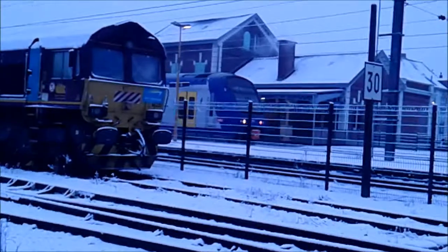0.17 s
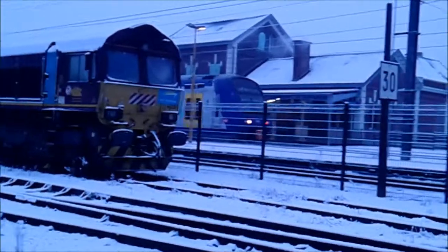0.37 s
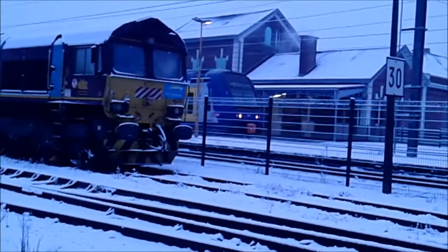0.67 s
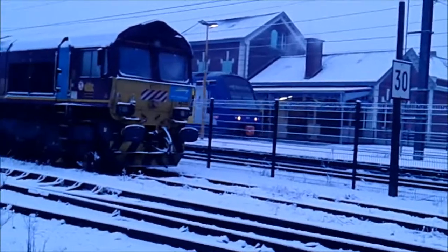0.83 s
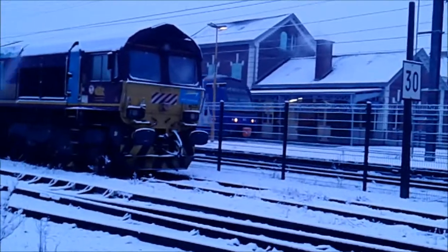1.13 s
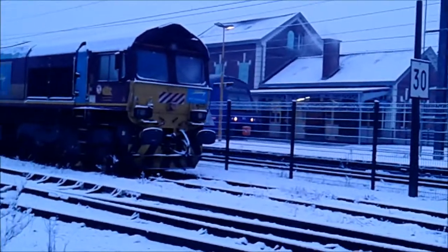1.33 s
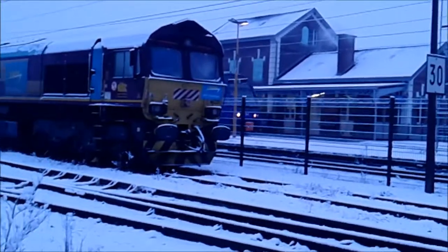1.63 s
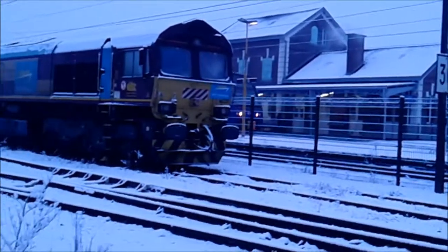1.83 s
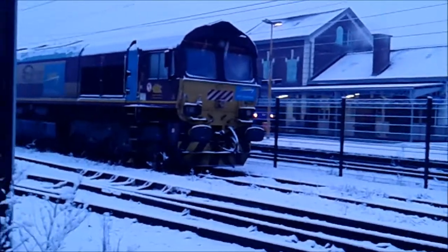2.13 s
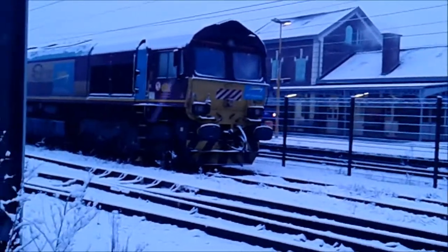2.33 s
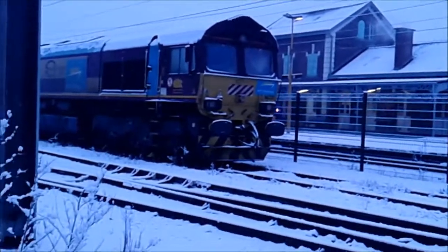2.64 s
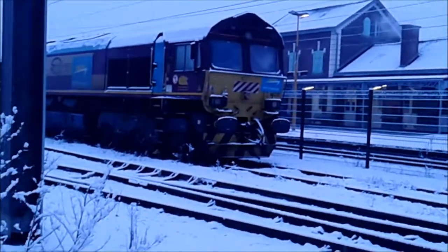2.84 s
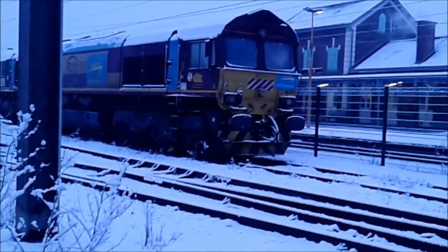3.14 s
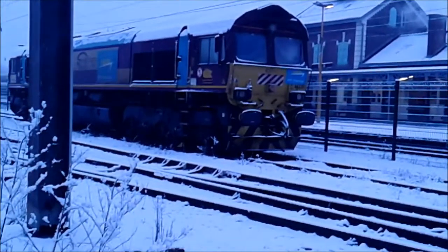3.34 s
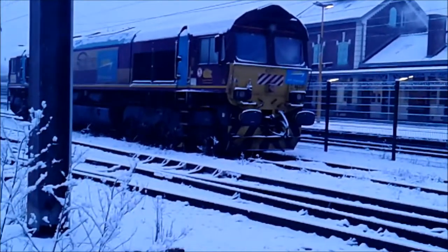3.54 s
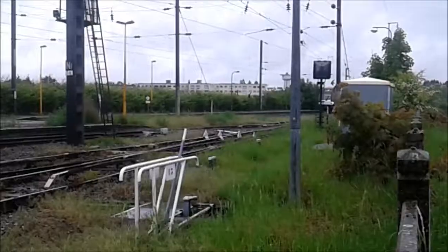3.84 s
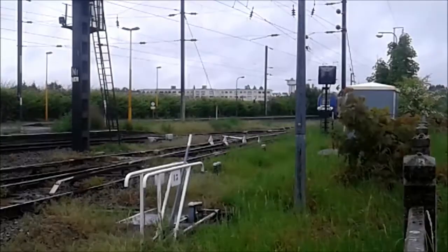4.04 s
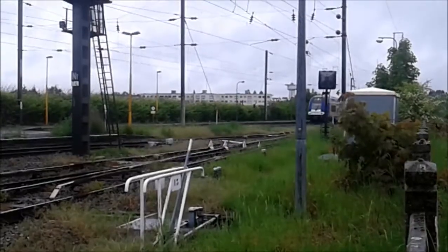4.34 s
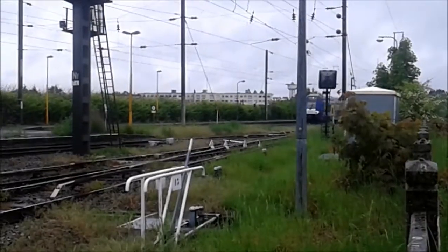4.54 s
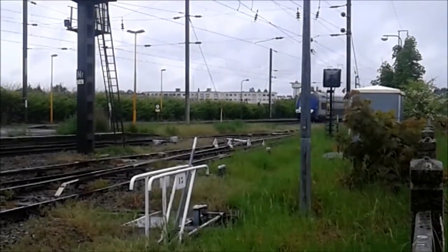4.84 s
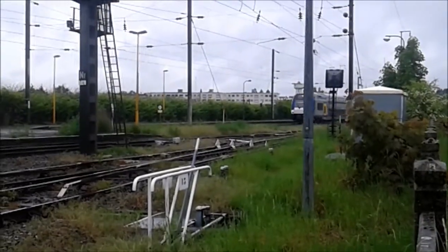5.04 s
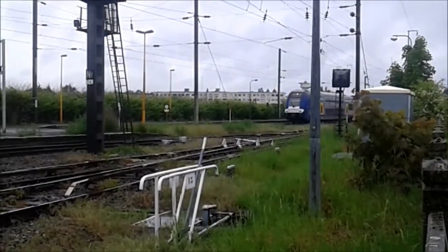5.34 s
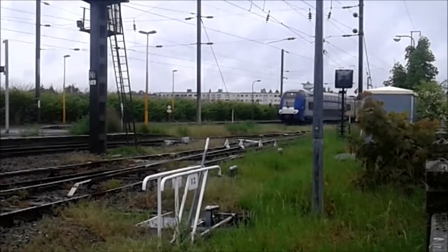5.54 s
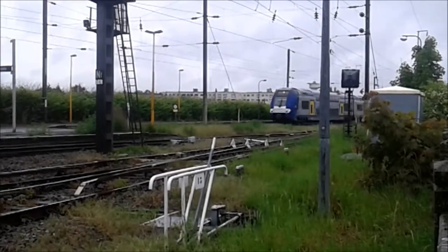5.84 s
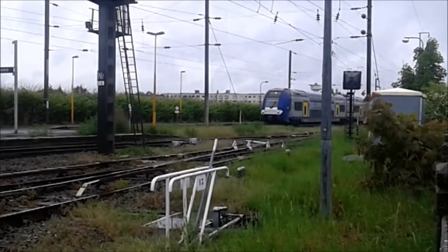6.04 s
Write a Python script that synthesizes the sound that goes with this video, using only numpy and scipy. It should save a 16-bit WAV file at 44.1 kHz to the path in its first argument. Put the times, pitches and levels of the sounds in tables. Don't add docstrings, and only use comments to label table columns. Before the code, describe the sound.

Outdoor rail yard through a handheld camera microphone with faint hiss. A diesel idles low while a train rolls by; fingers knock the camera, rails groan softly, sparrows chirp. Brief scrapes lead into a loud, high, wavering wheel squeal. It cuts to total silence, then a wet yard: rain patter, sharp drops ticking on the camera, and a train rumbling closer with soft thuds over joints.

```python
import sys
import numpy as np
from scipy import signal
from scipy.fft import rfft, irfft, next_fast_len
from scipy.io import wavfile
from scipy.ndimage import uniform_filter1d, map_coordinates

SR = 44100
rng = np.random.default_rng(int(sys.argv[2]) if len(sys.argv) > 2 else 0)


def store_wav(level_fs):
    pcm = np.round(np.clip(np.atleast_2d(level_fs), -1, 1) * 32767)
    wavfile.write(sys.argv[1], SR, pcm.T.astype(np.int16))


def linear_from_db(decibels):
    return 10 ** (np.asarray(decibels, float) / 20)


N = 273414


def unit(x):
    return x / np.sqrt(np.mean(np.abs(x) ** 2) + 1e-20)


def curves(rows):
    s, *cols = np.transpose(rows)
    return [np.interp(np.arange(N) / SR, s, c) for c in cols]


def wobble(rate_hz, count=N):
    knots = rng.standard_normal(int(count * rate_hz / SR) + 4)
    return map_coordinates(knots, [np.arange(count) * rate_hz / SR])


def filtered(x, response):
    m = next_fast_len(N + 8192)
    return irfft(rfft(x, m) * response(np.fft.rfftfreq(m, 1 / SR)), m)[:N]


def rush(spectrum, patchy_db):
    z = signal.stft(rng.standard_normal(N), nperseg=512)[2]
    field = uniform_filter1d(rng.standard_normal(z.shape), size=6, axis=0)
    field = uniform_filter1d(field, size=12, axis=1)
    x = signal.istft(z * linear_from_db(patchy_db * unit(field)), nperseg=512)[1][:N]
    f, db = np.transpose(spectrum)
    return unit(filtered(x, lambda hz: linear_from_db(np.interp(np.log(hz + 1), np.log(f), db, -120, -120))))


def ring(hz, t60_s, t):
    return np.sin(2 * np.pi * hz * t) * linear_from_db(-60 * t / t60_s) * (1 - np.exp(-t * hz * 2))


# (centre [Hz], width [Hz], level [dB rms])
IDLE_LINES = [
    (97.9, 33, -48),
    (390.2, 10, -59.5),
    (554, 8.6, -62.5),
    (2096, 21, -70),
]
# (frequency [Hz], density [dB per Hz])
SNOW_RUMBLE = [(12, -51), (20, -14.5), (86, 3), (102, -3.5), (125, -2.5), (261, -12), (311, -16.5),
               (353, -13), (380, -13), (400, -19), (520, -42.5), (880, -120)]
# (frequency [Hz], density [dB per Hz])
SNOW_ROLL = [(150, -39.5), (250, -6.5), (334, -10), (381, -4), (466, -8), (651, -10), (731, -12.5),
             (991, -12.5), (1650, -17.5), (2370, -19.5), (3820, -28.5), (4750, -14.5), (8000, -43.5),
             (10400, -62), (17600, -120)]
# (time [s], level [dB])
ROLLING = [
    (0, -50),
    (.2, -52),
    (.6, -50),
    (1.25, -53),
    (2.05, -49),
    (2.95, -49.5),
    (3.5, -51),
]
# (time [s], peak level [dB])
SCRAPES = [
    (1.285, -47.5),
    (1.37, -55),
    (1.42, -50),
]
SNOW_RUMBLE_DB, RUMBLE_FOLLOWS = -47, .5
SCRAPE_RISE_DB_S, SCRAPE_FALL_DB_S = 450, 800


def snowy_yard():
    roll_db, = curves(ROLLING)
    rumble_db = SNOW_RUMBLE_DB + RUMBLE_FOLLOWS * (roll_db - roll_db.mean())
    out = linear_from_db(rumble_db - 0.5 + 2.1 * wobble(9)) * rush(SNOW_RUMBLE, patchy_db=0.5)
    out += linear_from_db(roll_db + 0.72 + 0.52 * wobble(6)) * rush(SNOW_ROLL, patchy_db=1.3)
    for hz, width_hz, db in IDLE_LINES:
        line = lambda f: width_hz ** 2 / ((f - hz) ** 2 + width_hz ** 2 / 4)
        out += linear_from_db(db) * unit(filtered(rng.standard_normal(N), line))
    flange = [(3900, -20), (4400, -4), (4700, -6.0), (5100, -10.0), (5700, -31.5)]  # (Hz, dB per Hz)
    scrape = np.zeros(N)
    for s, db in SCRAPES:
        late = np.arange(N) / SR - s
        scrape += linear_from_db(db + np.minimum(SCRAPE_RISE_DB_S * late, -SCRAPE_FALL_DB_S * late))
    return out + scrape * linear_from_db(2.3 * wobble(59.7)) * rush(flange, patchy_db=0.5)


# (delay [s], length [s], start [Hz], middle [Hz], end [Hz])
CALL = [
    (0, .043, 3850, 4450, 4050),
    (.008, .033, 3400, 3650, 3500),
    (.048, .045, 3330, 3030, 3070),
]
# (time [s], pitch factor [1], level [dB])
CALLS_AT = [
    (.795, 1, -50.5),
    (1.954, .975, -53),
    (3.483, 1.005, -53.5),
]
# (time [s], length [s], start [Hz], end [Hz], level [dB])
CHEEPS = [(.214, .02, 4800, 4100, -51), (.755, .02, 4000, 4450, -53), (.77, .018, 4450, 4680, -44),
          (1.41, .05, 4400, 2500, -59), (.893, .015, 3420, 3550, -58), (1.96, .014, 2900, 3300, -52),
          (2.108, .014, 2750, 2750, -53), (3.525, .03, 3950, 3500, -57), (3.575, .03, 4100, 4400, -55),
          (3.6, .022, 3320, 3220, -56), (3.675, .03, 4150, 4050, -55), (3.685, .025, 3280, 3250, -58),
          (3.77, .03, 4050, 4100, -56), (.765, .012, 5150, 5200, -53), (4.81, .03, 4350, 4350, -46),
          (5.92, .022, 4400, 4350, -40), (5.945, .017, 4100, 4300, -45)]
CALL_FADES_DB_S, CHEEP_ARCH_HZ = 15, 100


def sparrows():
    out = np.zeros(N)
    notes = []
    for s, factor, db in CALLS_AT:
        for delay, length, *bend_hz in CALL:
            notes.append((s + delay, length, *np.multiply(factor, bend_hz), db - CALL_FADES_DB_S * delay))
    for s, length, start_hz, end_hz, db in CHEEPS:
        notes.append((s, length, start_hz, (start_hz + end_hz) / 2 + CHEEP_ARCH_HZ, end_hz, db))
    for s, length, start_hz, mid_hz, end_hz, db in notes:
        u = np.linspace(0, 1, round(length * SR))
        bend = np.polyfit([0, .5, 1], [start_hz, mid_hz, end_hz], 2)
        hz = rng.normal(1, .008) * np.polyval(bend, u)
        level = linear_from_db(db + 3 + 3.5 * wobble(130, count=len(u))) * np.abs(np.sin(np.pi * u)) ** .7
        out[round(s * SR):][:len(u)] += level * np.sin(2 * np.pi * np.cumsum(hz) / SR)
    walls = rng.standard_normal(SR // 3) * linear_from_db(-60 * np.arange(SR // 3) / SR / 0.6)
    return out + linear_from_db(-5) * signal.fftconvolve(out, walls / np.linalg.norm(walls))[:N]


# (time [s], peak level [dB], body [Hz], click [dB])
KNOCKS = [
    (0.355, -29.5, 455, -17.5),
    (0.396, -34, 522, -15),
    (0.414, -32.5, 716, -16.5),
    (0.467, -21.5, 665, -17.5),
]


def knocks():
    out, t = np.zeros(N), np.arange(SR // 25) / SR
    for s, db, body_hz, click_db in KNOCKS:
        body = linear_from_db(6.5) * ring(body_hz, 0.014, t)
        thump = linear_from_db(3.0) * ring(222, 0.017, t)
        click = ring(1230, 0.014, t) + ring(1740, 0.0057, t) + ring(2230, 0.005, t)
        knock = body + thump + linear_from_db(click_db + 14.0) * click
        out[round((s + .001) * SR):][:len(t)] += linear_from_db(db) * knock
    return out


ONSET_SHARE, RELEASE_SHARE, EDGE_DB = 0.33, 0.28, -9.5


def strand(s, length, start_hz, end_hz, db):
    share = np.array([0, ONSET_SHARE, 1 - RELEASE_SHARE, 1])
    pitch_hz = start_hz + (end_hz - start_hz) * share
    level_db = db + EDGE_DB * np.array([1, 0, 0, 1])
    return np.transpose([s + length * share, pitch_hz, level_db])


def sing(out, rows, flutter_hz, rough, fade_s=0.02):
    s, hz, db, *octave_db = np.transpose(rows)
    t = np.arange(s[0], s[-1] + fade_s, 1 / SR)
    gate = np.clip(np.minimum(t - s[0], t[-1] - t) / fade_s, 0, 1) ** 2
    shake = lambda rate_hz: unit(wobble(rate_hz, len(t)) + 1j * wobble(rate_hz, len(t)))
    slips = linear_from_db(-12) * shake(3.5 * flutter_hz) + linear_from_db(-28) * shake(11 * flutter_hz)
    grip = unit(np.sqrt(1 - rough) + np.sqrt(rough) * shake(flutter_hz) + slips)
    pitch_hz = np.interp(t, s, hz) * (1 + .0011 * wobble(25, len(t)))
    tone = grip * np.exp(2j * np.pi * np.cumsum(pitch_hz) / SR)
    sound = linear_from_db(np.interp(t, s, db)) * tone
    if octave_db:
        sound = sound + linear_from_db(np.interp(t, s, octave_db[0])) * tone ** 2 / np.abs(tone)
    start = round(s[0] * SR)
    return out + np.pad(np.sqrt(2) * gate * sound.real, (start, N - start - len(t)))


# (time [s], length [s], start [Hz], end [Hz], level [dB])
GRIPS = [(1.441, 0.13, 4595, 4604, -47), (1.49, 0.17, 4620, 4624, -34), (1.57, 0.28, 4645, 4616, -26),
         (1.75, 0.24, 4710, 4808, -24), (1.77, .26, 4726, 4665, -29), (1.85, 0.2, 4620, 4560, -30.5),
         (1.96, 0.17, 4762, 4763, -23.5), (2.1, 0.167, 4740, 4694, -33), (2.2, 0.25, 4700, 4680, -23.5),
         (2.31, .35, 4627, 4692, -27.5), (2.42, .24, 4697, 4720, -22.5), (2.57, .34, 4805, 4873, -31),
         (2.61, 0.32, 4750, 4803, -30), (2.83, .18, 4750, 4724, -28.5), (2.87, .27, 4834, 4823, -26),
         (2.96, .32, 4743, 4780, -21), (3.17, 0.26, 4800, 4824, -24), (3.26, .28, 4706, 4780, -28),
         (3.41, 0.18, 4910, 4938, -24), (3.57, 0.15, 4940, 4933, -31.5), (3.657, 0.21, 4893, 4940, -23)]
# (time [s], octave over fundamental [dB])
PRESSURE = [
    (1.5, -49),
    (1.85, -28.5),
    (2.05, -45),
    (2.3, -34),
    (2.56, -20.5),
    (2.9, -31),
    (3.1, -42),
    (3.36, -27),
    (3.62, -38.5),
]
# (time [s], length [s], start [Hz], end [Hz], level [dB])
SIDE_MODES = [(1.93, .34, 4338, 4362, -35.5), (2.4, .25, 4246, 4261, -54), (2.41, .22, 5164, 5162, -48),
              (2.6, .17, 4370, 4370, -58), (2.97, .23, 4385, 4382, -58), (3.43, .12, 5096, 5102, -50),
              (2.47, .35, 7285, 7410, -58.5), (2.87, .3, 7425, 7415, -64.5), (3.34, .39, 7450, 7368, -60),
              (2.98, .17, 7120, 7131, -62), (1.08, .38, 13303, 13245, -76), (2.38, .34, 14058, 14197, -74),
              (1.96, .2, 8700, 8700, -66), (2.82, .2, 4640, 4635, -46), (3.2, .1, 4910, 4910, -40),
              (3.72, .12, 4455, 4450, -57), (1.75, .2, 4820, 4860, -40)]
# (time [s], length [s], start [Hz], end [Hz], level [dB])
GROANS = [
    (.47, .16, 570, 600, -57),
    (.6, .3, 612, 642, -53.5),
    (.82, .32, 642, 654, -57),
    (.77, .33, 426, 436, -57),
    (2.09, .18, 985, 992, -57),
    (2.7, .19, 630, 605, -59.5),
    (2.88, .24, 590, 645, -52.5),
]


def squeal():
    out = np.zeros(N)
    for grip in GRIPS:
        rows = strand(*grip)
        octave_db = rows[:, 2] + np.interp(rows[:, 0], *np.transpose(PRESSURE))
        out = sing(out, np.column_stack([rows, octave_db]), flutter_hz=62, rough=.36)
    for mode in SIDE_MODES:
        out = sing(out, strand(*mode), flutter_hz=60, rough=.5)
    for groan in GROANS:
        out = sing(out, strand(*groan), flutter_hz=14, rough=.2)
    loud = np.sqrt(np.abs(uniform_filter1d(out ** 2, size=SR // 5)))
    steel = [(2500, -11), (4000, 5.5), (7000, -5), (14000, -10.5)]
    return linear_from_db(0.45) * out + linear_from_db(-30.5) * loud * rush(steel, patchy_db=2.5)


# (frequency [Hz], density [dB per Hz])
WET_RUMBLE = [(12, -48), (20, -24), (97, 0.5), (203, -7), (248, -14), (307, -15), (371, -24.5),
              (400, -16.5), (520, -65), (880, -120)]
# (frequency [Hz], density [dB per Hz])
WET_ROLL = [(180, -52), (300, -2), (373, -5.5), (585, 3.5), (938, 1), (1170, -4), (1490, -3), (1800, -8.5),
            (2340, -44), (3960, -120)]
# (frequency [Hz], density [dB per Hz])
RAIN = [(530, -28), (900, -9), (1010, 1), (1230, -4), (1500, 0.5), (1720, -5), (1970, 1), (2340, -3),
        (2750, -1), (3610, -6), (4560, -1.5), (8260, -20), (10000, -23), (13000, -24.5), (22000, -120)]
# (rumble [dB], rolling [dB], rain [dB])
WET_START_DB = (-40.5, -47, -44)
WET_FOLLOWS = (0.46, 1, 0.37)
# (time [s], rumble swell [dB])
JOINTS = [
    (5.52, 3.5),
    (5.6, 2),
    (5.96, 2),
    (6.13, 3),
]
ARRIVES_S, NEARING_DB_S, JOINT_S = 4.6, 6, 0.026


def wet_yard():
    t = np.arange(N) / SR
    nearer_db = NEARING_DB_S * np.clip(t - ARRIVES_S, 0, None)
    rumble_db, roll_db, rain_db = (db + share * nearer_db for db, share in zip(WET_START_DB, WET_FOLLOWS))
    for s, swell_db in JOINTS:
        rumble_db = rumble_db + swell_db * np.exp(-((t - s) / JOINT_S) ** 2)
    out = linear_from_db(rumble_db + 0.33 + 1.52 * wobble(14)) * rush(WET_RUMBLE, patchy_db=0.5)
    out += linear_from_db(roll_db - 0.2 + 0.64 * wobble(9.1)) * rush(WET_ROLL, patchy_db=1.8)
    patter = linear_from_db(2.2 * wobble(400))
    return out + linear_from_db(rain_db + 0.97) * unit(patter * rush(RAIN, patchy_db=1.5))


# (time [s], shell [Hz], shell level [dB], port level [dB])
HEAVY = [(4.2639, 3010, -22, -30.5), (4.3505, 1810, -38, -54), (4.3565, 3380, -39, -35.5),
         (4.4154, 2560, -22, -23.5), (4.4691, 1720, -36.5, -37.5), (4.5992, 1510, -37, -36),
         (4.6607, 2050, -24.5, -31), (4.7093, 2000, -26, -34), (4.7161, 2560, -22.5, -23.5),
         (4.9646, 1850, -22.5, -31), (5.1521, 1940, -14, -27), (5.4337, 1310, -39, -35),
         (5.4569, 2480, -27.5, -27), (5.7695, 2520, -40, -33), (5.774, 2300, -26.5, -33.5),
         (5.8098, 1920, -27, -30), (5.8948, 1740, -24, -28), (6.0802, 1830, -32.5, -29),
         (6.1483, 2110, -30.5, -36)]
# (time [s], port level [dB])
LIGHT = [(4.3201, -37), (4.5803, -40), (4.6319, -39.5), (4.6779, -36), (4.7715, -41), (4.8734, -40),
         (4.9469, -40), (5.1855, -39), (5.2195, -42), (5.3606, -40), (5.5457, -39), (5.6302, -39.5),
         (5.7522, -38.5), (5.7866, -38), (5.8512, -33), (6.0583, -35.5), (6.1063, -39), (6.1596, -36)]
# (time [s], half length [s], level [dB])
SPRAY = (5.052, .007, -37)
HEAVY_SPLASH_DB, LIGHT_SPLASH_DB, LIGHT_SHELL_DB = -12.5, -4, -16
PORT_HZ = 4750


def drops():
    out, t = np.zeros(N + SR), np.arange(SR // 50) / SR
    high = signal.butter(2, (5500, 8600), "bandpass", fs=SR)
    burst = lambda x, db: linear_from_db(db + 16.8) * x / np.linalg.norm(x)
    hits = [(*row, row[-1] + HEAVY_SPLASH_DB) for row in HEAVY]
    for s, db in LIGHT:
        hits.append((s, rng.uniform(1300, 3000), db + LIGHT_SHELL_DB, db, db + LIGHT_SPLASH_DB))
    for s, shell_hz, shell_db, port_db, splash_db in hits:
        u = 1.2 * np.pi * shell_hz * t - 2.4
        push = (2 * u ** 2 - 1) * np.exp(-u ** 2)
        splash = signal.lfilter(*high, rng.standard_normal(len(t)) * linear_from_db(-60 * t / .004))
        tick = burst(push + .8 * ring(shell_hz, .005, t), shell_db)
        tick += burst(ring(PORT_HZ * rng.normal(1, .04), .0027, t), port_db)
        tick += burst(splash, splash_db)
        lag = round(rng.normal(2, .1) * SR / shell_hz)
        tick[lag:] += .45 * tick[:-lag].copy()
        out[round((s - .0004) * SR):][:len(t)] += tick
    s, half_s, db = SPRAY
    mist = [(3800, -20), (4800, 1), (7500, -4), (11000, -18)]  # (Hz, dB per Hz)
    swell = np.exp(-((np.arange(N) / SR - s) / half_s) ** 2)
    spray = linear_from_db(db) * swell * rush(mist, patchy_db=4)
    body = lambda hz: 1 / (1 + (800 / (hz + 1)) ** 4) / (1 + (hz / 9000) ** 6)
    return filtered(out[:N], body) + spray


def scene():
    snow = np.arange(N) < 4 * SR
    yards = np.where(snow, snowy_yard() + squeal(), wet_yard())
    return (yards + drops() + knocks() + sparrows())[None]


# (low [Hz], high [Hz], squeal limit [dB])
GAPS = [
    (5250, 5700, -24),
    (5700, 5950, -28),
    (5950, 6250, -29),
    (6250, 6800, -21),
]


def gapped(x):
    hz, _, z = signal.stft(x, SR, nperseg=1024)
    squeal_bins = z[(hz > 4500) & (hz < 5000)]
    power = uniform_filter1d(np.sum(np.abs(squeal_bins) ** 2, axis=0), size=3)
    for low_hz, high_hz, limit_db in GAPS:
        squeal_db = 10 * np.log10(np.abs(power) + 1e-12)
        dropped = squeal_db + 3.5 * wobble(SR / 3, count=len(power)) > limit_db
        z[np.ix_((hz > low_hz) & (hz < high_hz), dropped)] = 0
    return signal.istft(z, SR, nperseg=1024)[1][:N]


def low_pass(x):
    return signal.sosfilt(signal.butter(12, 16110, fs=SR, output="sos"), x)


# (frequency [Hz], density [dB per Hz])
HISS = [(200, -8), (2000, 1), (8000, -8.5), (15000, -8)]
# (start [s], end [s])
SILENCE = (3.8453, 4.2345)
TOP_HZ = 15350


def record(dry):
    t = np.arange(N) / SR
    heard = dry[0] + linear_from_db(-54.5) * rush(HISS, patchy_db=2.0)
    limited = filtered(gapped(heard), lambda hz: hz < TOP_HZ)
    mix = limited[None] * ((t < SILENCE[0]) | (t > SILENCE[1]))
    return low_pass(mix)


dry = scene()
out = record(dry)
store_wav(out)
```